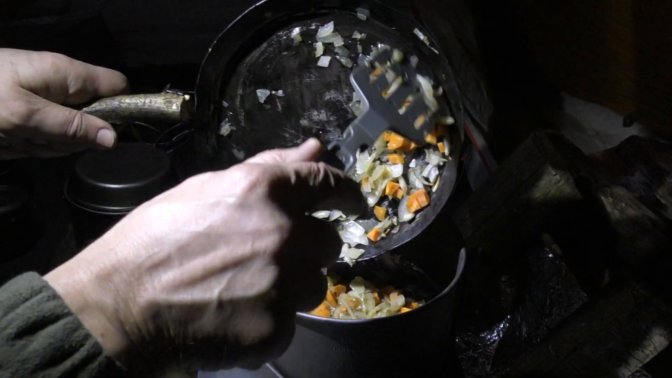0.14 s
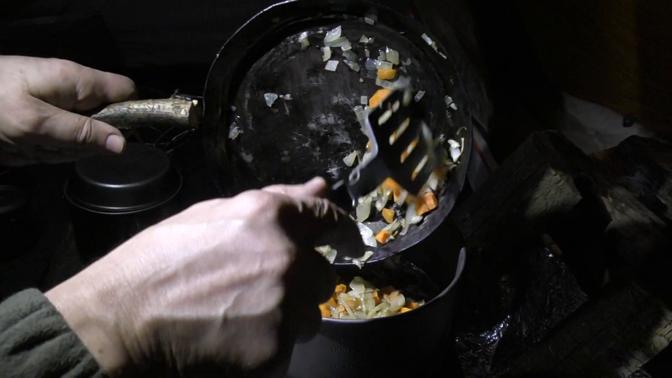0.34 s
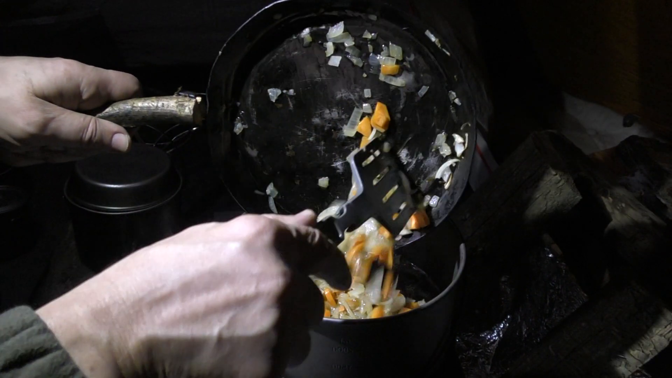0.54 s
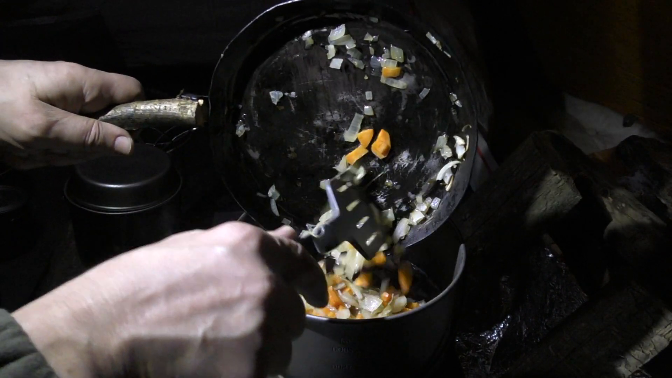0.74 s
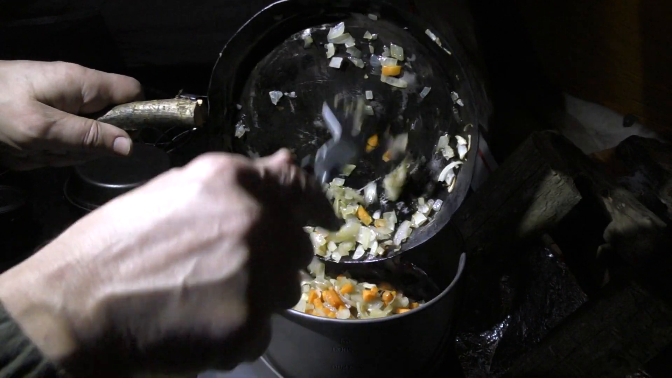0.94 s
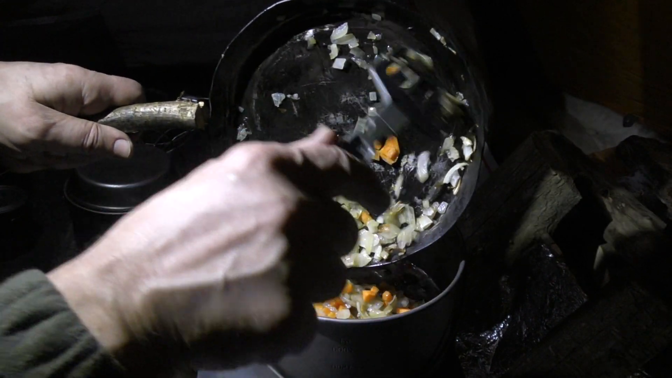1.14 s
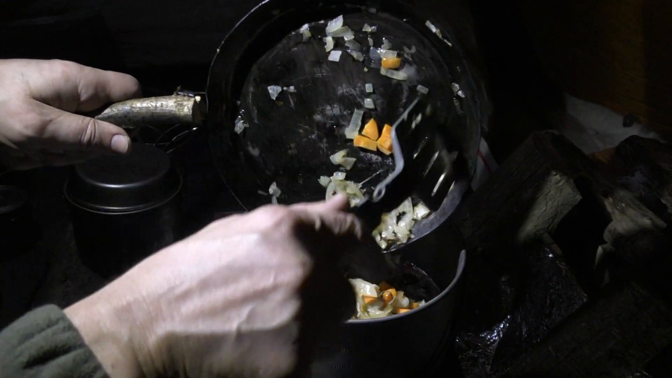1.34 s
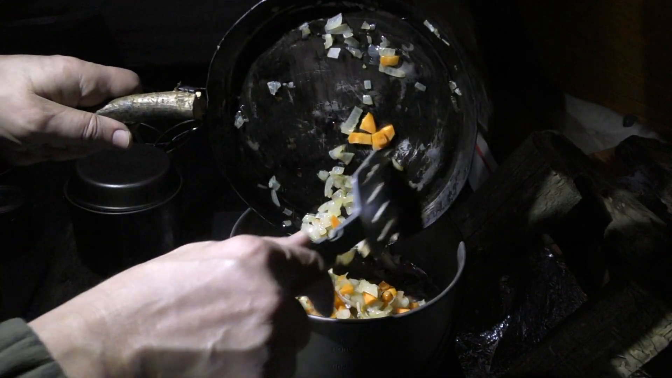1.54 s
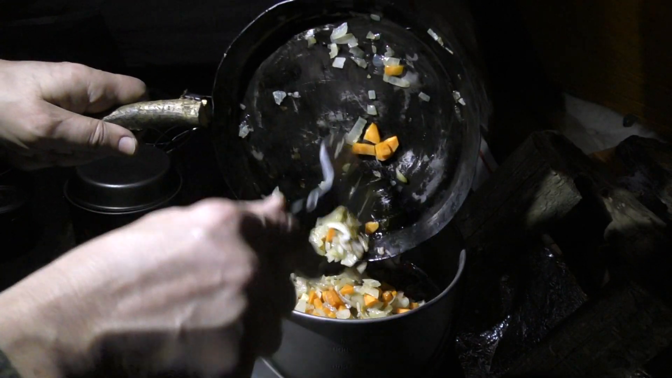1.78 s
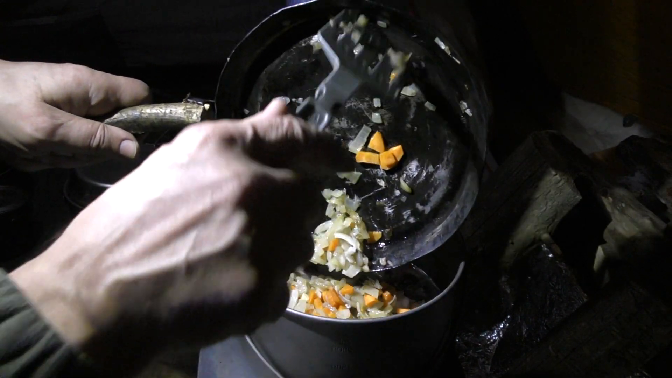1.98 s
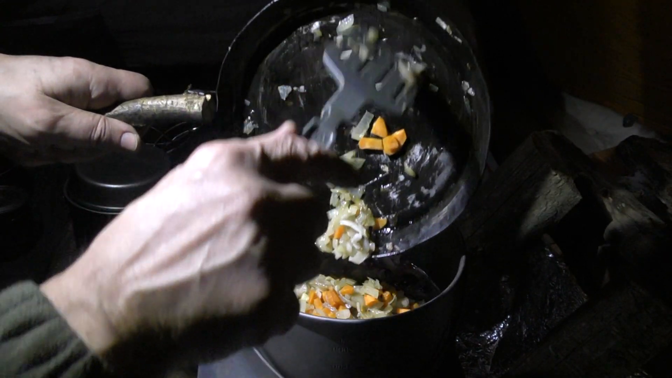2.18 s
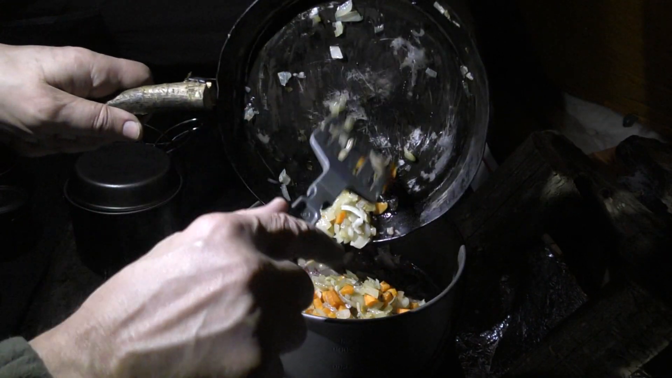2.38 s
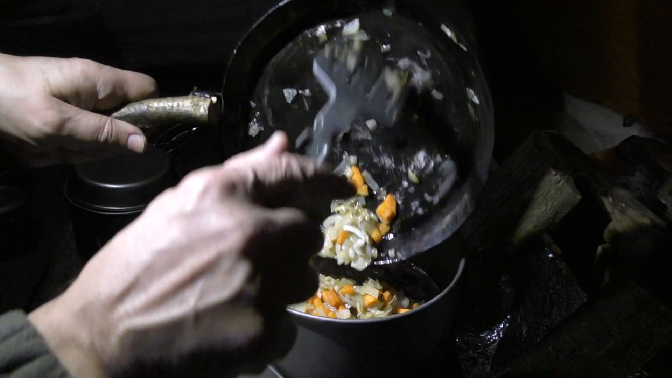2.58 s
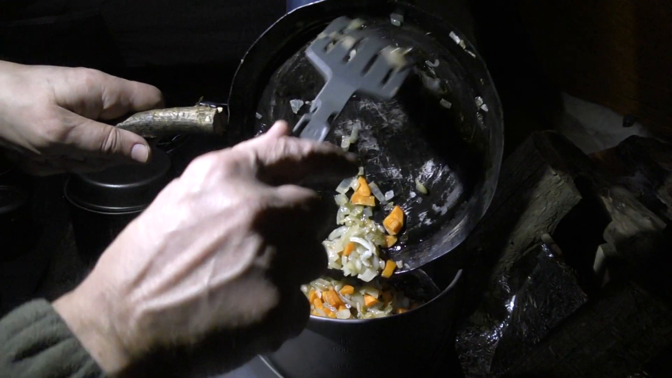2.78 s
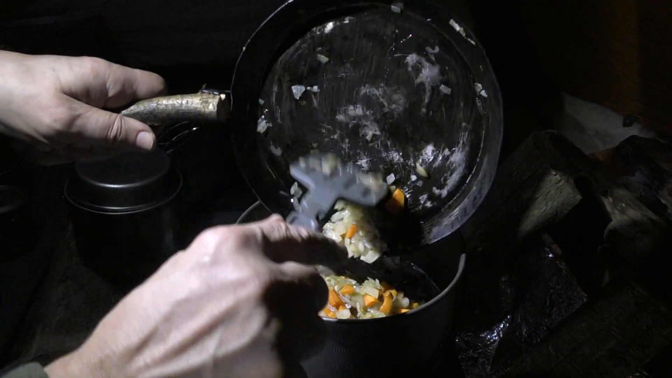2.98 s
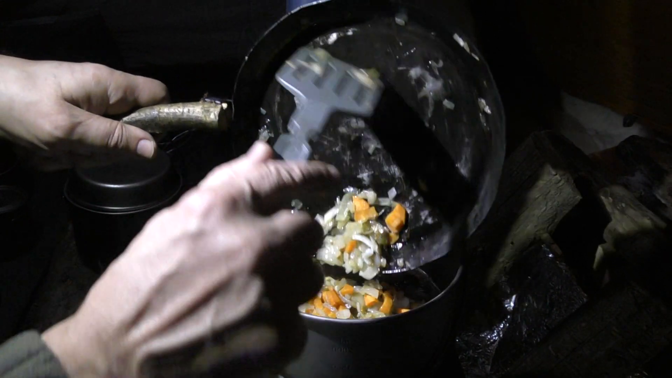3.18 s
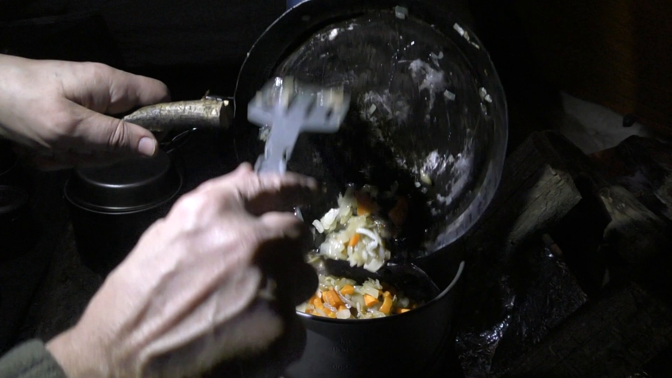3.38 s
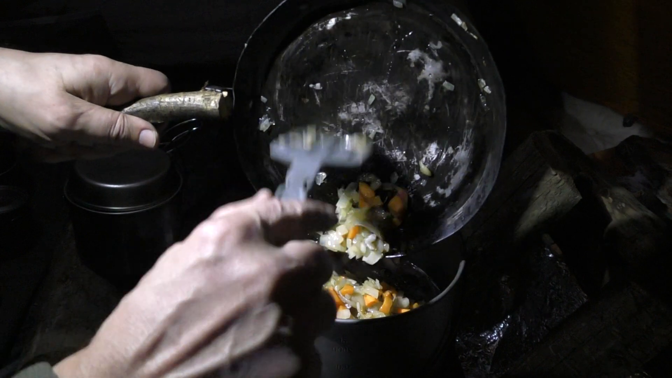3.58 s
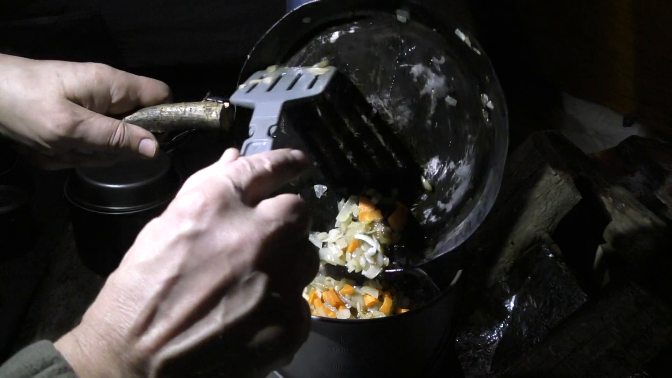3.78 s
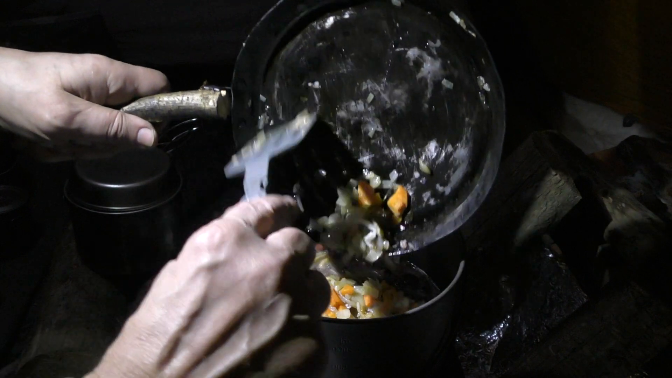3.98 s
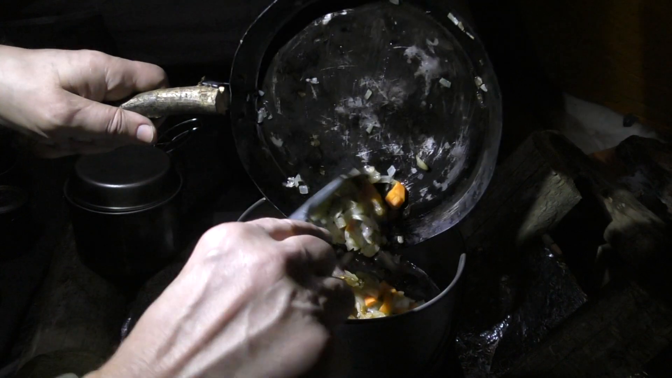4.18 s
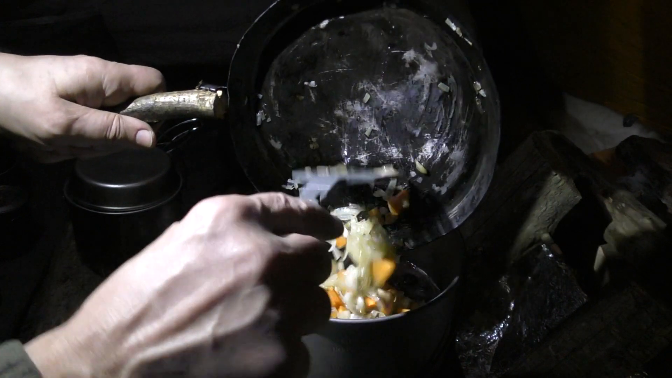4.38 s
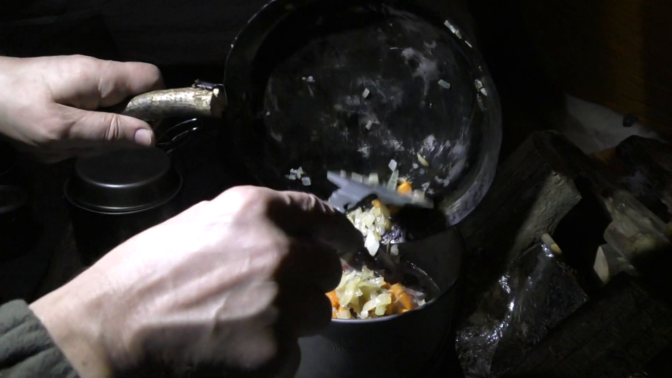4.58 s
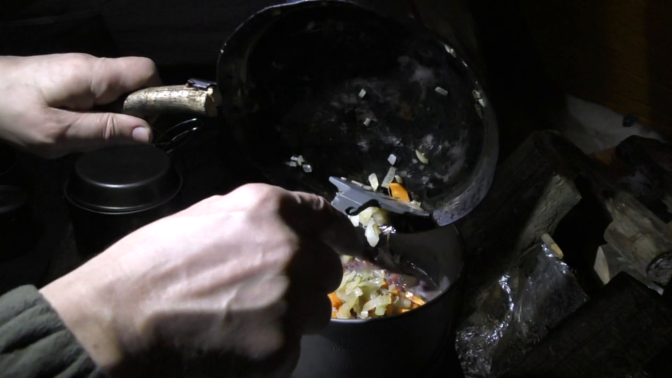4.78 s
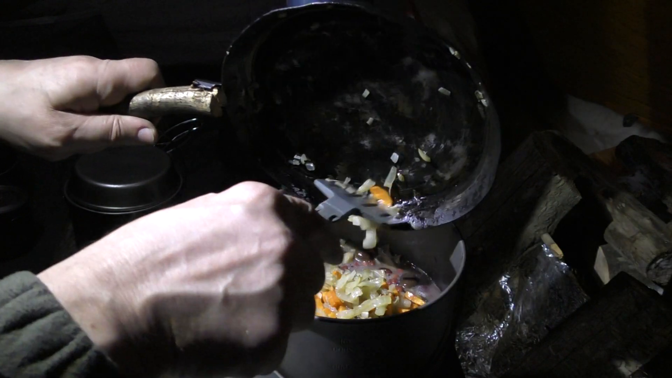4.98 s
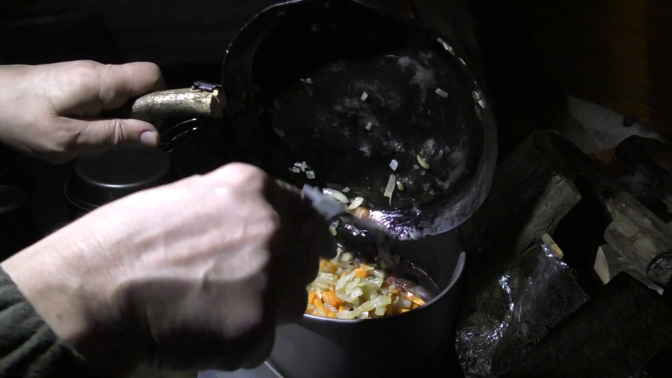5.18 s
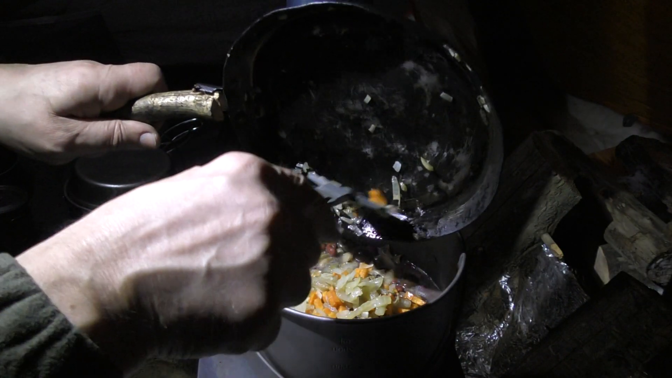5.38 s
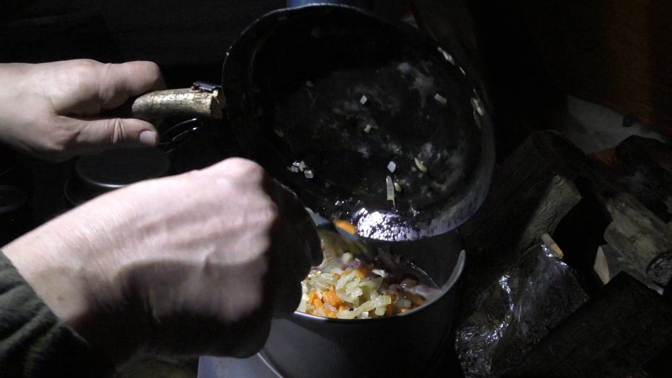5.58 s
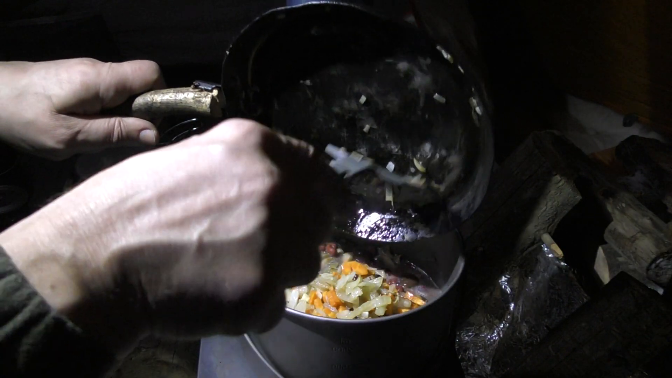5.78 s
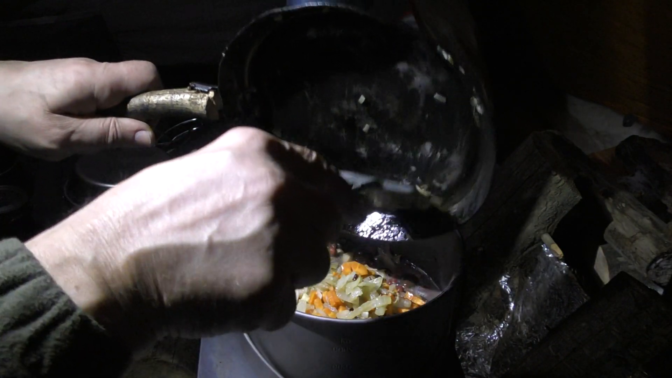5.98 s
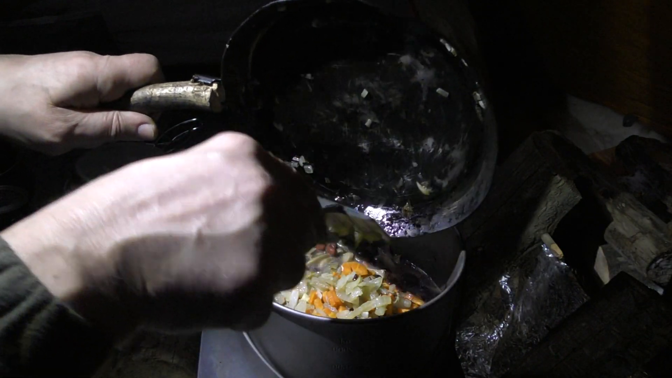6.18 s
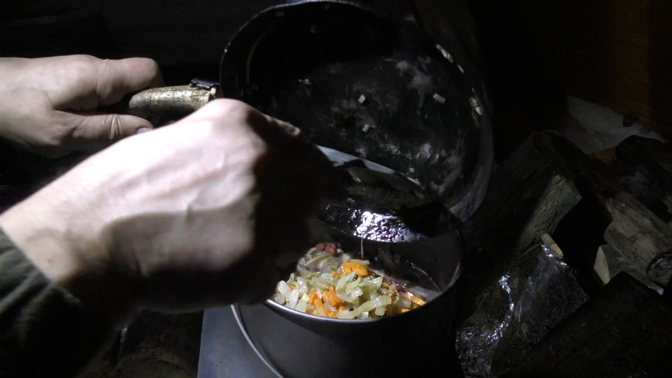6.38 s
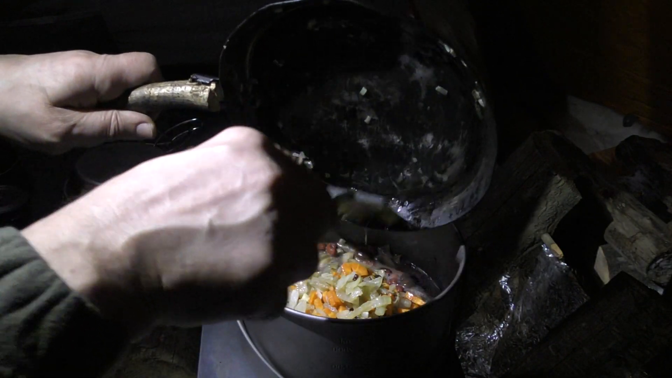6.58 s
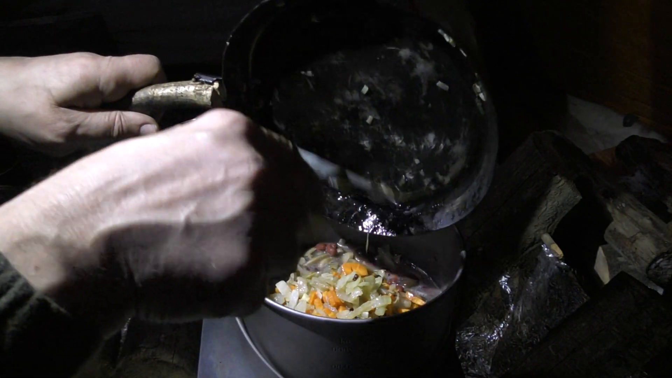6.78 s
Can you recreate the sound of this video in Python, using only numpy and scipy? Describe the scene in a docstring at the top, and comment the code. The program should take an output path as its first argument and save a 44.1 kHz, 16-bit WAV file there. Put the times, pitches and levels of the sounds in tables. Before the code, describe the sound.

A metal spatula drags softly through cooked vegetables in a frying pan, then scrapes the bare bottom harder, knocking and squeaking briefly where it sticks. Short strokes on the rim follow, with sharp ringing clinks from the pan and the pot beneath it. Small wet smacks of falling food come now and then. The sound is close and dry, in a tent, with a faint sizzle and steady low rumble underneath.

```python
"""Inside a tent, one microphone close to a tilted frying pan: a metal spatula pushes vegetables into a pot.
First the blade drags through the food on the pan's wall, with one wet smear. From 2 s it scrapes the
bare floor, knocking, and groaning where it sticks and slips. From 4.5 s it works along the rim.
Pan and pot ring when it slips off, loudest near the end. Wet scraps drop now and then,
and a faint sizzle and a low rumble lie under it all."""
import sys
import numpy as np
from scipy import signal
from scipy.fft import rfft, irfft, next_fast_len
from scipy.io import wavfile
from scipy.ndimage import map_coordinates

SR = 44100
rng = np.random.default_rng(int(sys.argv[2]) if len(sys.argv) > 2 else 0)


def digitize_waveform(pressure):
    """Quantize a signal to 16-bit integers and store it at the path in sys.argv[1].

    Rows of a 2-D input are taken as channels; values are limited to [-1, 1].
    """
    field = np.atleast_2d(pressure).T
    bounded = np.clip(field, -1, 1)
    quanta = np.round(bounded * 32767).astype(np.int16)
    wavfile.write(sys.argv[1], SR, quanta)


N = 301627
TIME = np.arange(N) / SR
TAPS, LEAD = 4096, 128  # samples: length of a response, and the room ahead of its onset
HZ = np.fft.rfftfreq(TAPS, 1 / SR)
BAND_EDGES_HZ = (600, 1200, 3500)  # borders of the thump, body, clank and click bands
WALL, FLOOR, RIM, STRUCK = range(4)  # ways the blade touches the pan

# Strokes of the blade. Each row: start, attack, hold and release in seconds; then in dB pressure,
# sag over the hold, weight (body over clank), weight gained on the way, grit (click over clank);
# last the touch.
STROKES = [(0.0, 0.0019, 0.006, 0.12, -42.5, 5, 2.5, 3, 1, WALL),
           (0.108, 0.013, 0.032, 0.1, -47, 5.5, 5, -9, 4, WALL),
           (0.188, 0.033, .012, 0.16, -41, 5.5, 0.5, -9, 0, WALL),
           (0.264, 0.16, 0.079, 0.2, -25.5, 14, -6.5, 10, -6.5, WALL),
           (0.521, 0.15, 0.011, 0.025, -34.5, 4, -1.5, -9, -3, WALL),
           (0.685, 0.017, .034, 0.079, -35, 0, -9, -16, -7, WALL),
           (1.114, 0.0085, 0.024, 0.037, -45.5, -3, 3.5, 4, 3.5, WALL),
           (1.18, 0.079, 0.13, 0.06, -41, 5, 6, -12, -4, WALL),
           (1.378, 0.071, 0.15, 0.13, -32.5, 4.5, 2, 3, -2.5, WALL),
           (2.11, .095, 0.037, 0.16, -21, 1, -10.5, -4, -4, FLOOR),
           (2.272, 0.093, 0.045, 0.051, -21, 0, -2.5, 15, -7.5, FLOOR),
           (2.759, 0.042, 0.074, 0.071, -21.5, 2, -9.5, -14, -8, FLOOR),
           (2.828, 0.025, 0.13, 0.017, -20, -2, -6.5, 7, -3.5, FLOOR),
           (3.307, 0.094, 0.09, 0.066, -13.5, 3.5, -8.5, 6.5, -5.5, FLOOR),
           (3.79, 0.1, 0.25, 0.13, -28, -3, 2.5, -2.5, -7, FLOOR),
           (3.964, 0.043, 0.026, 0.12, -16, 7.5, -2, 8, -8, FLOOR),
           (4.493, 0.0087, 0.097, .03, -39, -2.5, 6, 7, -9.5, RIM),
           (4.556, 0.045, 0.055, 0.021, -11.5, 7, -17, 4, -14.5, RIM),
           (4.847, 0.028, 0.011, 0.45, -40, 13.5, 4, -20, 2.5, RIM),
           (4.916, 0.2, .01, 0.031, -45.5, 4, -16, -4, 3.5, RIM),
           (5.315, 0.0083, 0.096, 0.019, -27.5, 0, -5, 19, -10.5, RIM),
           (5.515, .045, 0.02, 0.029, -45, -3, -2, 0, 0.5, RIM),
           (5.852, 0.011, 0.063, 0.022, -30.5, -6.5, -7, -11, -6.5, RIM),
           (5.92, 0.024, 0.057, 0.11, -10.5, 3, -20, -12, -11, RIM),
           (6.081, 0.067, 0.029, 0.025, -29.5, -5, 3.5, -9, -5.5, RIM),
           (6.382, 0.021, 0.1, .03, -26, -7.5, -11.5, 6, -11, RIM),
           (6.578, 0.0072, 0.057, 0.029, -34, -7, 3.5, -10, -8.5, RIM)]
# The pan's modes, damped by blade and food. Each row: frequency and width in Hz, then height in dB
# when rubbed on the wall, on the floor, on the rim, and when struck.
PAN_MODES = [(771, 78, 14, 17, 14.5, 17.5), (867, 65, 2.5, 13.5, -4, 0), (1012, 126, 12.5, 15, 13.5, 9),
             (1195, 124, 9.5, 11.5, 4.5, 13), (1473, 177, 13, 11.5, 20.5, 27),
             (1708, 178, 15.5, 6.5, 7, 13), (1957, 42, 13.5, 7, 17, 9), (2086, 133, 15, 6.5, 7.5, 15),
             (2258, 98, 15, 8.5, 3.5, 4.5), (2438, 21, 7, 2, 12.5, 2.5), (2625, 200, 3, -0.5, 13, -1),
             (2730, 420, 7, 3.5, -15, -3), (3027, 176, 3, 7.5, 13, 8.5), (3315, 35, 6, 6.5, 10, 10),
             (3612, 210, -1, 6, 0, 10), (3934, 120, 10, 6.5, 5, 5.5), (4300, 50, -10, -6, 1, 3),
             (4470, 270, 8.5, 3, 1.5, 2), (5110, 73, 6, 9.5, -5, 5.5), (5620, 57, 6, 8, 6.5, 6)]
# The broad spectrum under the modes. Each row: frequency in Hz, then level in dB for the same touches.
PAN_SLOPE = [(150, -5.5, -19.5, -29.5, -22), (400, 6, -11, -10.5, -7.5), (702, 3, -6, -14.5, -3),
             (886, 2.5, -6, -9, 2.5), (1430, -10.5, -1.5, -23, -22.5), (2480, -12.5, 0.5, -2.5, 5),
             (3200, -5, -8, -13, -8.5), (5860, -0.5, -14.5, -19.5, -14), (7700, -10, -23, -31.5, -27),
             (9730, -5.5, -20.5, -27.5, -25.5), (13500, -17, -30.5, -34.5, -34.5),
             (15800, -23, -47, -50, -74)]
# The blade hits or catches on the pan. Each row: start in seconds, level in dB of thump, body, clank
# and click, the blade's note in Hz.
KNOCKS = [(1.118, -38.5, -51, -38, -66, 1360), (1.1952, -38, -33.5, -33, -34, 1880),
          (1.308, -32, -39, -41, -51, 1640), (1.473, -29, -23.5, -38, -34, 1660),
          (2.008, -39, -28.5, -34.5, -34, 1600), (2.023, -28, -28.5, -57, -36.5, 1380),
          (2.0905, -28.5, -35, -27, -39.5, 1340), (2.3485, -62, -30, -21, -35, 1315),
          (2.368, -59, -18, -30, -54, 1320), (2.6615, -27, -18, -22.5, -24, 2290),
          (2.705, -23.5, -33, -36, -43, 1550), (2.848, -28.5, -30, -18, -29, 1440),
          (3.379, -41, -20, -18, -23, 1520), (3.2322, -21, -20, -12, -18.5, 1860),
          (3.751, -26, -16.5, -9, -18.5, 1410), (3.798, -46, -33.5, -32.5, -49, 1470),
          (3.888, -43, -31, -31, -47, 1500), (4.492, -33, -19.5, -12.5, -30, 2170),
          (4.591, -54, -35, -11, -59, 2030), (4.825, -30.5, -21.5, -24, -31, 2120),
          (5.86, -45, -28, -23.5, -26.5, 2420), (6.013, -23, -18, -16.5, -25, 2050),
          (6.378, -45, -30, -16.5, -22.5, 1910), (6.507, -27, -20, -53, -34, 2160)]
# The blade sticks and slips. Each row: start and length in seconds, first and last pitch in Hz,
# level in dB.
GROANS = [(1.235, 0.072, 774, 785, -44), (1.488, 0.046, 802, 770, -25), (1.559, 0.062, 765, 762, -25.5),
          (2.379, 0.031, 982, 900, -17.5), (2.926, 0.057, 1193, 922, -15), (3.416, 0.033, 1004, 910, -15),
          (3.499, 0.017, 933, 775, -20), (4.055, 0.023, 977, 1054, -10.5)]
# The blade slips off. Each row: start in seconds, pan level in dB, pot level in dB, the frequency
# in Hz that this spot of the pan favours.
RELEASES = [(2.427, -30, -58, 1470), (2.666, -23, -52, 1480), (2.981, -29, -60, 1180),
            (3.236, -19.5, -42, 1440), (3.51, -33, -60, 3100), (4.65, -43, -37, 1510),
            (4.826, -19, -52, 1010), (6.014, -9, -29, 1540), (6.177, -24, -31, 1460),
            (6.381, -18, -30, 1510), (6.508, -10, -26, 2100), (6.638, -45, -25, 2400)]
# The free pan, and the pot it leans on. Each row: frequency in Hz, relative level in dB, t60 in seconds.
PAN_RING = [(781, -1, .08), (1174, -2, .18), (1470, -2, .13), (2083, -4, .07), (2186, -10, .15),
            (2385, -3, .2), (2815, -14, .24), (3040, -10, .16), (3295, -12, .16), (4592, -22, .11),
            (5618, -24, .12)]
POT_RING = [(963, 0, .38), (1970, -3, .2), (2966, -19, .3), (3295, -4, .16), (4240, -24, .25)]
# Wet scraps land or come unstuck. Each row: time in seconds, relative peak in dB, centre in Hz.
SCRAPS = [(0.1127, -35, 2130), (0.145, -28, 2200), (0.193, -30.5, 2220), (0.2145, -34, 2150),
          (0.871, -43, 11000), (1.0396, -35, 4240), (1.7463, -32, 6500), (4.3734, -32.5, 2260),
          (4.8099, -19, 2140), (4.8765, -34, 2390), (5.2533, -29.5, 3940), (5.493, -22.5, 4930),
          (5.5157, -29.5, 5370), (5.576, -27.5, 5200), (5.7585, -34, 4800), (6.2874, -23, 3170)]
# Wet food smeared over hot metal. Each row: time in seconds, relative level in dB.
SMEAR_LEVEL = [(1.22, -67), (1.3, -44), (1.37, -65), (1.48, -47.5), (1.68, -59)]
# The sizzle of the hot food. Each row: time in seconds, level in dB.
SIZZLE_LEVEL = [(0, -59), (1.7, -58), (2.6, -59.5), (3.6, -61.5), (4.4, -55), (5, -55), (5.7, -56.5),
                (6.84, -54.5)]
# Spectra of the sizzle and of the tent's ambience. Each row: frequency in Hz, relative level in dB.
SIZZLE_COLOUR = [(800, -13), (2200, -6.5), (4500, -0.5), (7500, -7), (10500, -10), (16000, -17.5)]
AMBIENCE_COLOUR = [(12, -46), (20, 0), (49, -1), (216, -16), (367, -16.5), (558, -19), (1030, -29),
                   (2200, -30.5), (2460, -36), (4940, -43), (16000, -66)]


def scrape(touch, slips_per_s, spread_db, judder_db, judder_rate, flutter_db, bands_db,
           crackle, grains_per_s):
    """Tiny slips drive the pan; they bunch as the blade judders, and the colour flutters as it flexes."""
    slips = unit_rms(clicks(slips_per_s, spread_db) * gain_of(judder_db * wander(judder_rate)))
    # crushed bits of food add coarser grains to the click band
    gritty = unit_rms(slips + crackle * clicks(grains_per_s, spread_db=5))
    drives = [slips, slips, slips, gritty]
    out = np.zeros(N)
    for drive, force, response, db in zip(drives, stroke_force(touch), pan_bands(touch), bands_db):
        flutter = unit_rms(gain_of(flutter_db * wander(90)))
        out += gain_of(db) * signal.oaconvolve(drive * force * flutter, response)[LEAD:][:N]
    return out


def stroke_force(touch, bite_db=26, lift_db=45, grit_fade_db=0.5):
    """The force in each band swells as the blade bites, holds while it travels and dies as it lifts."""
    force = np.zeros((4, N))
    for start, attack, hold, release, pressure, sag, weight, gained, grit, where in STROKES:
        if where != touch:
            continue
        corners = np.cumsum([0, attack, hold, release])
        t = np.arange(0, corners[-1], 1 / SR)
        swell = np.interp(t, corners, [-bite_db, 0, -sag, -sag - lift_db])
        travel = t / corners[-1] - .5
        body = weight + gained * travel
        click = grit - grit_fade_db * travel  # duller as food heaps up before the blade
        thump = 0.58 * swell + 0.79 * body
        for band, db in enumerate([thump, swell + body, swell, swell + click]):
            add(force[band], start, gain_of(pressure + db) * signal.windows.tukey(len(t), .04))
    return force


def pan_bands(touch, blade_db=0):
    """The pan's answer to one click, with the blade's own colour, split into four bands of energy 1."""
    low_cut_db = 10 * np.log10(1 + (150 / (HZ + 1)) ** 4)
    db = spectrum_at(np.array(PAN_SLOPE)[:, [0, 1 + touch]], HZ) - low_cut_db + blade_db
    for hz, width, *heights_db in PAN_MODES:
        db += heights_db[touch] / (1 + ((HZ - hz) / width) ** 2) ** 2
    response = np.roll(causal_response(db), LEAD)
    lowpasses = [1 / (1 + (HZ / edge) ** 8) for edge in BAND_EDGES_HZ]
    bands = irfft(rfft(response) * np.diff(lowpasses, axis=0, prepend=0, append=1))
    return bands / np.linalg.norm(bands, axis=1, keepdims=True)


def edge_echo(x, echo, sway, delay_s=0.001294, sway_rate=35):
    """Each slip comes back from the pan's edge; the blade's travel shifts the delay and the resonances."""
    delay = delay_s * np.exp(sway * wander(sway_rate))
    reflected = map_coordinates(x, [(TIME - delay) * SR], order=3)
    return (x + echo * reflected) / np.sqrt(1 + echo ** 2)


def singing(x, t60, main_db, fine_db, fine_t60, count=45):
    """Rubbing keeps the pan's sharp modes sounding, along with many fine ones in the treble."""
    t = np.arange(SR // 3) / SR
    fine_hz = np.geomspace(3300, 14000, count) * rng.uniform(.985, 1.015, count)
    fine = [(hz, fine_db, fine_t60) for hz in fine_hz]
    main = [(hz, main_db, t60) for hz, _, _ in PAN_RING[1:]]
    response = np.zeros(len(t))
    for hz, db, ring_s in main + fine:
        decay = gain_of(-60 * t / ring_s)
        response += gain_of(db) * 2 * decay / decay.sum() * np.cos(2 * np.pi * hz * t)
    return x + signal.oaconvolve(x, response)[:N]


def knocks(chatter=0.21, chatter_s=0.0054, note_db=8, note_width_hz=110):
    """The blade lands with one sharp blow and chatters briefly; its note depends on where it touches."""
    out, t = np.zeros(N), np.arange(TAPS) / SR
    for start, *bands_db, note_hz in KNOCKS:
        contact = chatter * rng.standard_normal(TAPS) * np.exp(-t / chatter_s)
        contact[0] += 1  # the blow itself
        blade_db = note_db / (1 + ((HZ - note_hz) / note_width_hz) ** 2)
        for response, db in zip(pan_bands(STRUCK, blade_db), bands_db):
            knock = signal.fftconvolve(contact, response)
            attack = knock[LEAD:][:SR // 100]
            add(out, start - LEAD / SR, gain_of(db) * knock / attack.std())
    return out


def groans(jitter=0.03, overtone_db=-16):
    """Pressed hard, the blade sticks and slips in step with a resonance: short, unsteady tones."""
    out, unsteady = np.zeros(N), 1 + jitter * wander(400)
    for start, length, first_hz, last_hz, db in GROANS:
        n = round(length * SR)
        hz = np.linspace(first_hz, last_hz, n) * unsteady[round(start * SR):][:n]
        phase = 2 * np.pi * np.cumsum(hz) / SR
        tone = unit_rms(np.sin(phase) + gain_of(overtone_db) * np.sin(2 * phase))
        add(out, start, gain_of(db) * tone * signal.windows.tukey(n, .7))
    return out


def ringing(favour_db=11, octaves=0.26, rise_s=0.0031):
    """Freed from the blade, pan and pot ring out; the spot where it leaves decides which pan modes lead."""
    out, t = np.zeros(N), np.arange(SR // 2) / SR
    rise = 1 - np.exp(-t / rise_s)
    for start, pan_db, pot_db, spot_hz in RELEASES:
        pan = [(hz, db + pan_db - favour_db * min(abs(np.log2(hz / spot_hz)) / octaves, 1), t60)
               for hz, db, t60 in PAN_RING]
        pot = [(hz, db + pot_db, t60) for hz, db, t60 in POT_RING]
        for hz, db, t60 in pan + pot:
            tone = np.sin(2 * np.pi * (hz * t + rng.random()))
            add(out, start, gain_of(db - 60 * t / t60) * rise * tone)
    return out


def scraps(decay_s=0.006, octaves=0.99, skirt_db=30, level_db=-2, lag_s=0.0044):
    """Each wet scrap gives a short smack as it lands or comes unstuck."""
    out, t = np.zeros(N), np.arange(TAPS) / SR
    for start, db, hz in SCRAPS:
        colour = causal_response(-skirt_db * np.log10(1 + (np.log2((HZ + 1) / hz) / octaves) ** 2))
        burst = rng.standard_normal(TAPS) * np.exp(-t / decay_s)
        smack = signal.fftconvolve(burst, colour)
        add(out, start + lag_s, gain_of(db + level_db) * smack / abs(smack).max())
    return out


def smear(centre_hz=10800, width_hz=2400, grains_per_s=2500, level_db=-3):
    """Wet food spread over the hot metal gives a very high, fine crackle."""
    hz = np.fft.rfftfreq(N, 1 / SR)
    band = 1 / (1 + ((hz - centre_hz) / width_hz) ** 4)
    fizz = unit_rms(irfft(rfft(clicks(grains_per_s, spread_db=2)) * band, N))
    times, db = np.transpose(SMEAR_LEVEL)
    return fizz * np.interp(TIME, times, gain_of(db + level_db), left=0, right=0)


def tent(x, t60=0.047, wet_db=-13):
    """Cookware and cloth close to the microphone scatter a short, weak echo."""
    t = np.arange(SR // 4) / SR
    echoes = rng.standard_normal(len(t)) * gain_of(-60 * t / t60) * (t > .002)
    return x + gain_of(wet_db) * signal.oaconvolve(x, echoes / np.linalg.norm(echoes))[:N]


def sizzle():
    """The hot food crackles faintly in thousands of tiny clicks a second."""
    crackle = coloured(clicks(rate=3200, spread_db=0.5), SIZZLE_COLOUR)
    return crackle * gain_of(np.interp(TIME, *np.transpose(SIZZLE_LEVEL)))


def ambience(level_db=-46):
    """A steady low rumble and hiss in the tent."""
    return gain_of(level_db) * coloured(rng.standard_normal(N), AMBIENCE_COLOUR)


def gain_of(db):
    """Turns decibels into a gain."""
    return 10 ** (np.asarray(db) / 20)


def unit_rms(x):
    """Scales to rms 1."""
    return x / np.sqrt(np.mean(x ** 2) + 1e-20)


def spectrum_at(points, hz):
    """Interpolates a spectrum in dB on a log-frequency axis."""
    points_hz, db = np.transpose(points)
    return np.interp(np.log(hz + 1), np.log(points_hz), db)


def add(mix, start_s, sound):
    """Mixes a sound in at a time."""
    part = mix[max(round(start_s * SR), 0):][:len(sound)]
    part += sound[:len(part)]


def coloured(x, points):
    """Gives a long sound a spectrum, at rms 1."""
    size = next_fast_len(N, real=True)
    gain = gain_of(spectrum_at(points, np.fft.rfftfreq(size, 1 / SR)))
    return unit_rms(irfft(rfft(x, size) * gain, size)[:N])


def wander(rate):
    """A random curve through rate points a second, at rms 1."""
    knots = rng.standard_normal(N // 20)
    return unit_rms(np.interp(TIME * rate, np.arange(len(knots)), knots))


def clicks(rate, spread_db):
    """Random clicks of either sign and uneven size, about rate a second."""
    chance, size = rng.random((2, N))
    hit, out = chance < rate / SR, np.zeros(N)
    signed = 2 * size[hit] - 1
    out[hit] = np.sign(signed) * gain_of(spread_db * np.minimum(-np.log(abs(signed) + 1e-9), 4))
    return unit_rms(out)


def causal_response(db):
    """The minimum-phase impulse response of a gain curve, with energy 1."""
    cepstrum = irfft(np.log(gain_of(db) + 1e-6))
    cepstrum[1:TAPS // 2] *= 2
    cepstrum[TAPS // 2 + 1:] = 0
    response = irfft(np.exp(rfft(cepstrum)))
    return response / np.linalg.norm(response)


def scene():
    """Strokes, knocks and falling food close up in the tent, with rumble and sizzle behind; mono."""
    wall = scrape(WALL, slips_per_s=3500, spread_db=2, judder_db=-0.4, judder_rate=180, flutter_db=2.6,
                  bands_db=(-6, -3.5, -2.5, -7.5), crackle=0.33, grains_per_s=400)
    floor = scrape(FLOOR, slips_per_s=1800, spread_db=-1.5, judder_db=2.5, judder_rate=220,
                   flutter_db=0.94, bands_db=(-14, -3.7, -3.3, -4.5), crackle=0.18, grains_per_s=710)
    rim = scrape(RIM, slips_per_s=3900, spread_db=-1, judder_db=1.2, judder_rate=220, flutter_db=3.5,
                 bands_db=(-15.5, -7, -4.5, -5.5), crackle=0.47, grains_per_s=420)
    # a blade pressed flat into the food damps the pan; on the rim it leaves it free
    wall = edge_echo(wall, echo=0.24, sway=0.13)
    wall = singing(wall, t60=0.051, main_db=-8, fine_db=-3.5, fine_t60=0.089)
    floor = edge_echo(floor, echo=0.46, sway=0.16)
    floor = singing(floor, t60=0.078, main_db=-3, fine_db=-5, fine_t60=0.063)
    rim = singing(rim, t60=0.087, main_db=2, fine_db=0.5, fine_t60=0.11)
    close_up = wall + floor + rim + groans() + knocks() + scraps() + smear()
    return (tent(close_up) + ringing() + ambience() + sizzle())[None]


def record(dry, ceiling=0.74, cutoff_hz=16050):
    """The hardest blows overload the close microphone; then the highest treble is cut."""
    limited = dry / (1 + (dry / ceiling) ** 8) ** (1 / 8)
    lowpass = signal.firwin(255, cutoff_hz, window=("kaiser", 9), fs=SR)
    return signal.oaconvolve(limited, lowpass[None], "same")


dry = scene()
out = record(dry)
digitize_waveform(out)
```